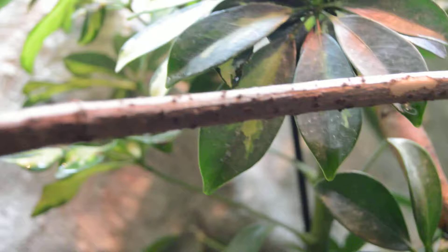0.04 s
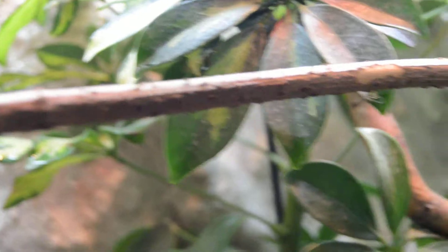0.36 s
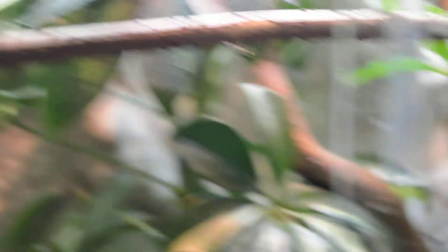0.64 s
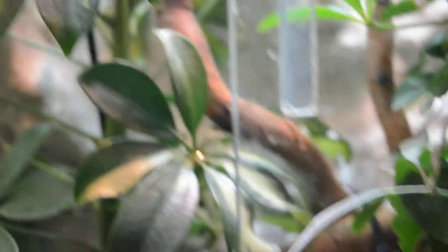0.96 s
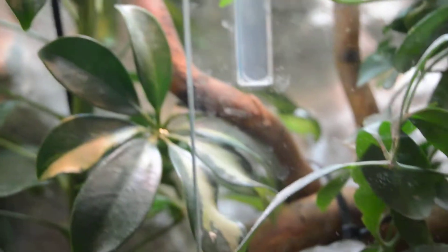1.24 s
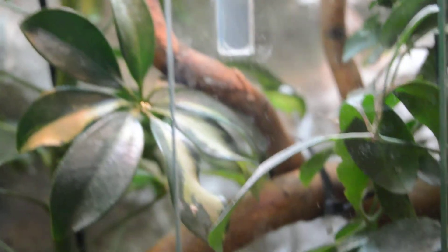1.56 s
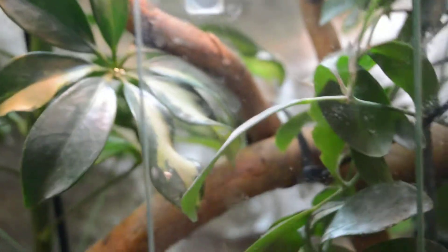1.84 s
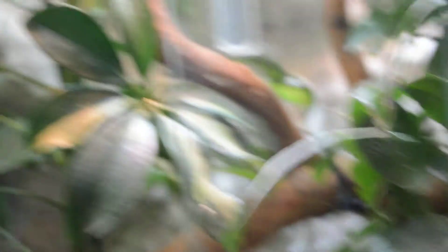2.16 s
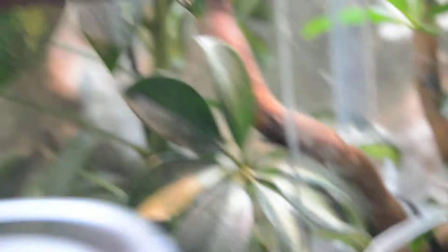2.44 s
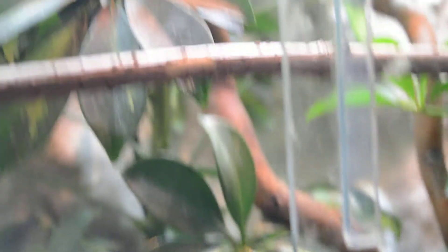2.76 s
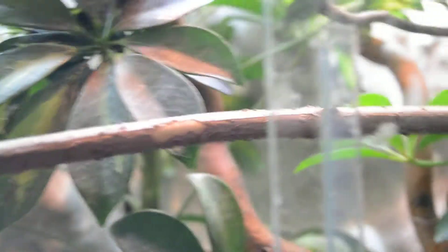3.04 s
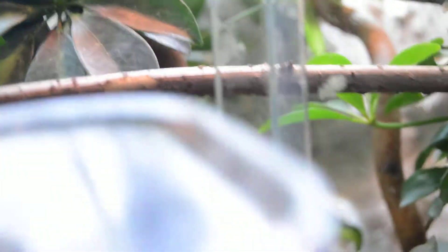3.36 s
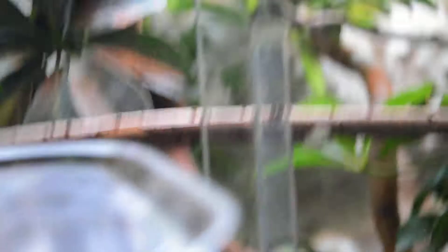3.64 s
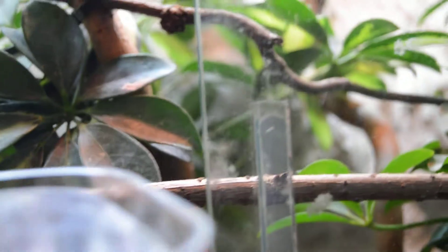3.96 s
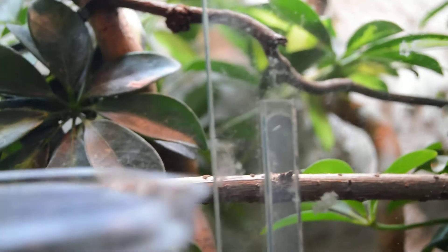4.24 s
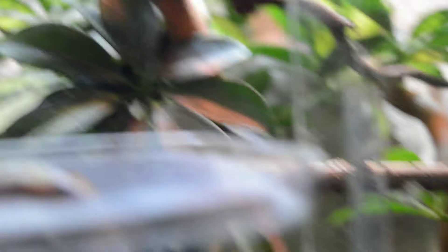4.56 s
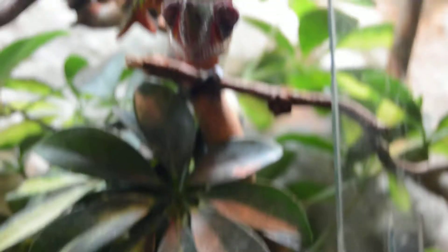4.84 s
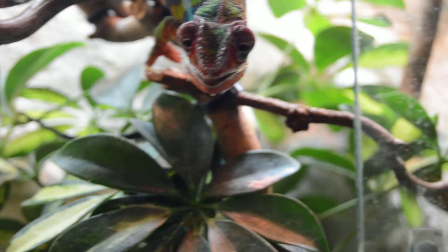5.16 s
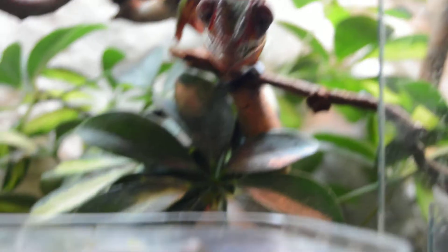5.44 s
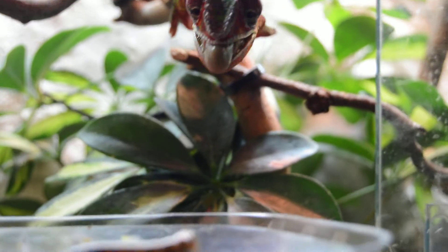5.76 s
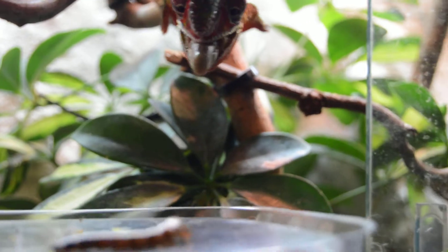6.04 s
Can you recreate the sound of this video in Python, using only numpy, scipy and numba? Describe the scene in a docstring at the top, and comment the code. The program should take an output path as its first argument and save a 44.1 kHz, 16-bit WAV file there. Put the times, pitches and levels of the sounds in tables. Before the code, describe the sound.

A thin plastic tub clicks, a catch snaps, and a glass terrarium door jerks free with a loud knock, then scrapes briefly.

```python
"""Plastic tub and terrarium door.

A thin plastic feeding tub clicks and flexes in the hand beside a leafy glass terrarium. A catch snaps.
The glass door jerks free with a rattling knock, then scrapes over grit in its track in two pushes.
Each impact is a noise crack plus damped modes. The sound fades in with a faint crackly hiss;
leaves then tick and rustle softly over room hiss and hum."""
import sys
import numpy as np
from scipy import signal
from scipy.fft import rfft, irfft
from scipy.io import wavfile
from scipy.ndimage import uniform_filter1d
from numba import njit

SR = 44100
rng = np.random.default_rng(int(sys.argv[2]) if len(sys.argv) > 2 else 0)


def output_pcm(signal):
    """Save a mono or channel-first signal as 16-bit PCM at the path in sys.argv[1].

    Samples are clipped to [-1, 1] before scaling.
    """
    pcm = np.clip(np.atleast_2d(signal).T, -1, 1) * 32767
    wavfile.write(sys.argv[1], SR, np.round(pcm).astype(np.int16))


N = 277389
RING_SAMPLES = SR // 4
CUTOFF_HZ = 15800

# room air: freq_hz, gain_db
AIR_SPECTRUM = [(25, -12), (45, -9.5), (85, -3), (150, -2.5), (230, -1), (330, -4), (600, -5), (1100, -6),
                (2000, -9), (3500, -11.5), (6000, -14), (8300, -14), (12000, -15.5), (15000, -19)]
# narrow high hiss: freq_hz, gain_db
HISS_SPECTRUM = [(9000, -34.5), (9750, -8), (9930, 17), (10150, -7), (11000, -25.5)]
# mains hum: freq_hz, level_db
HUM_PARTIALS = [(60, -72), (120, -76)]
# room reflections: freq_hz, gain_db
REVERB_SPECTRUM = [(100, 3.5), (700, 2.5), (1500, 3), (3000, -2.5), (7000, -2), (11000, -6.5), (16000, -16)]

# faint crackly hiss as the sound fades in (first row), then leaf rustles: middle_s, length_s, level_db
CRACKLE_SWELLS = [(.17, 0.29, -52), (.5, 0.12, -55), (.68, 0.086, -54), (.82, 0.24, -54.5),
                  (1.13, 0.2, -55.5), (1.55, 0.28, -59.5), (2.15, .2, -56), (3.27, 0.3, -57),
                  (5.84, 0.1, -59)]
# leaf and grit ticks: start_s, level_db
LEAF_TICKS = [(0.264, -40), (0.2865, -42), (0.6757, -36), (0.6986, -34), (0.711, -44), (0.7794, -36),
              (1.0744, -44), (1.1234, -41), (1.183, -35), (3.1774, -47), (5.8474, -35)]
# crackle and ticks: freq_hz, gain_db
CRACKLE_SPECTRUM = [(500, -16.5), (1500, -5), (4000, -3.5), (6000, -3.5), (8500, 3), (10500, 2.5),
                    (12500, -14.5), (16000, -23.5)]

# grip shifts on the tub: middle_s, length_s, level_db
GRIP_STROKES = [(.29, 0.08, -57), (.78, 0.6, -60), (1.4, .7, -55.5), (2.97, 0.5, -57.5), (4.55, 0.92, -64),
                (5.77, 0.14, -58.5), (6.04, 0.15, -58.5)]
# hand on plastic: freq_hz, gain_db
RUB_SPECTRUM = [(40, -19), (120, -11), (240, -2), (400, -8.5), (800, -9.5), (2500, -19.5), (8000, -35.5)]
# plastic creaks: start_s, pitch_hz, level_db
GRIP_CREAKS = [(.262, 2570, -53), (.287, 1450, -44), (.288, 2570, -50), (.314, 2500, -55),
               (.342, 2500, -46)]
# tub wall snaps: start_s, level_db, bass_db, treble_db
TUB_HITS = [(1.3326, -17.5, -4, 3), (1.3352, -23, 3, -6), (1.3463, -11, -8.5, 1), (1.3512, -21.5, 5.5, -19),
            (1.4125, -38, 9, 4), (1.4215, -32, 3, 0), (1.4405, -24.5, 18.5, 2.5), (1.4465, -35.5, 30.5, 1),
            (1.4552, -31, 9, -3), (1.4605, -38, 10, 3), (1.5465, -42, 4, 12), (1.5530, -39, 19, 13.5)]
# tub wall modes: freq_hz, level_db, t60_s
TUB_RING = [(236, -26.5, 0.072), (440, -31, 0.088), (628, -19.5, 0.053), (848, -13.5, 0.033),
            (1076, -17.5, 0.044), (1270, -16, 0.03), (1670, -15.5, 0.033), (1870, -20, 0.043),
            (2620, -27, 0.017), (2930, -13.5, 0.016), (3550, -17.5, 0.024), (4090, -7.5, .014),
            (4900, -26, .02), (6140, -26, 0.014), (7500, -9, 0.0055), (9000, -11, 0.014),
            (10000, -17.5, 0.034), (11400, -15, .015)]
# dense modes of tub and catch: freq_hz, gain_db
CLICK_SPECTRUM = [(200, -18.5), (700, 2.5), (2800, -0.5), (5500, -6.5), (10500, -11), (13000, -17.5),
                  (15800, -32)]
# catch snap: start_s, level_db, bass_db, treble_db
CATCH_HITS = [(2.2028, -13.5, 2, 1)]
# catch modes: freq_hz, level_db, t60_s
CATCH_RING = [(175, -31, 0.049), (756, -23, .02), (1140, -19, .033), (1280, -18, 0.04), (2230, -9, 0.031),
              (2490, -8.5, 0.037), (3304, -4, .018), (4250, -27.5, 0.013), (6310, -10.5, .012),
              (7370, -16.5, .011), (8100, -8, .01), (9330, -7, 0.011), (10400, -6, 0.0069)]

# door squeaks: start_s, length_s, start_hz, end_hz, level_db
DOOR_SQUEAKS = [(2.058, 0.016, 12100, 11500, -44), (3.214, 0.003, 10200, 10150, -35.5)]
# effort of the halting push: time_s, level_db, relative_treble_db
FIRST_PUSH = [(2.39, -46, -4), (2.422, -45, 0), (2.454, -34.5, -2.5), (2.484, -42, -0.5), (2.594, -53, 6.5),
              (2.606, -44.5, -1), (2.644, -58, -2), (2.708, -40, -4), (2.79, -54, 5), (2.822, -49, 6),
              (2.936, -54.5, 6), (2.945, -60, -1)]
# effort of the firm push: time_s, level_db, relative_treble_db
SECOND_PUSH = [(2.956, -49, 2), (2.964, -41, 5.1), (3.022, -44.5, 4.5), (3.03, -40, 5.8), (3.172, -50, 1.4),
               (3.182, -58, 6)]
# glass on grit: freq_hz, gain_db
SCRAPE_SPECTRUM = [(400, -18), (900, -4.5), (1350, 4.5), (1750, 5), (2250, 7.5), (2950, 2.5), (3600, 4.5),
                   (4700, 0.5), (5400, 2), (6200, -3.5), (7100, 2), (8000, 0), (11000, 0.5), (15500, -13)]
# scrape colour along the track: time_s, resonance_hz, hollow_hz
SCRAPE_TRAVEL = [(2.48, 9700, 6200), (2.72, 10600, 8500), (2.98, 9400, 7660), (3.02, 9100, 3970),
                 (3.15, 9400, 2160)]
# small slips, weak in bass: freq_hz, gain_db
SLIP_SPECTRUM = [(600, -6.5), (1500, -3.5), (2000, 0)]
# door hits its track: start_s, level_db, bass_db, treble_db
DOOR_HITS = [(2.3122, -4, -14, 4.5), (2.3209, -12, -16, 0), (2.3231, -12, -18, -3),
             (2.3325, 6.5, -10, -1.5), (2.3349, 4.5, -4, 2), (2.3425, -19, -14, -2), (2.3706, -3, -28, -1),
             (2.4680, -27, -5, -13), (2.9575, -29, -8, 4), (2.9920, -31, -6, 3), (3.0475, -27, -9, 13),
             (3.1213, -20, 0, 4.5), (3.1685, -30, -3, 6)]
# pane modes: freq_hz, level_db, t60_s
PANE_RING = [(829, -21, .06), (1260, -30, .05), (1980, -24, .11), (2170, -23, .11), (2384, -23, .15),
             (2461, -25, .14), (2597, -28, .12), (2830, -22, .09), (3020, -23, .08), (4180, -26, .07),
             (5103, -24, .09), (5410, -22, .1), (7493, -26, .09), (7938, -25, .09), (8340, -24, .1),
             (8617, -22, .1), (8966, -25, .1), (9380, -22, .11), (9800, -23, .11), (10043, -24, .1)]
# dense modes of the pane: freq_hz, gain_db
PANE_SPECTRUM = [(200, -25), (600, -22), (1500, -11), (2300, 1), (3000, 2), (3600, -7), (4300, -2),
                 (4750, -6), (5300, 1), (6200, -7), (8600, 1), (10200, 0), (12000, -11), (15800, -27)]


def amp(db):
    """Decibels to gain."""
    return 10 ** (np.asarray(db) / 20)


def unit_rms(x):
    """Scale to rms 1."""
    return x / np.sqrt(np.mean(x ** 2) + 1e-20)


def curves(rows):
    """Breakpoint columns, interpolated per sample."""
    times_s, *columns = np.transpose(rows)
    return [np.interp(np.arange(N) / SR, times_s, column) for column in columns]


def gate(rows):
    """Soft-edged gate over a curve's span."""
    t = np.arange(N) / SR
    return uniform_filter1d(1. * ((t > rows[0][0]) & (t < rows[-1][0])), size=40)


def swells(rows, end_drop_db=7.5):
    """Gain of bell-shaped swells, summed in power."""
    t = np.arange(N) / SR
    power = np.zeros(N)
    for middle_s, length_s, level_db in rows:
        drop_db = end_drop_db * np.minimum((2 * (t - middle_s) / length_s) ** 2, 20)
        power += amp(level_db - drop_db) ** 2
    return np.sqrt(power)


def add(out, start_s, sound):
    """Mix in at start_s."""
    at = int(np.clip(round(start_s * SR), 0, N - 1))
    out[at:at + len(sound)] += sound[:N - at]


def response(spectrum, size=8192):
    """Minimum-phase impulse response of a spectrum."""
    hz, db = np.transpose(spectrum)
    grid_hz = np.maximum(np.fft.rfftfreq(size, 1 / SR), 1)
    gain = amp(np.interp(np.log(grid_hz), np.log(hz), db))
    cepstrum = irfft(np.log(gain))
    cepstrum[1:size // 2] *= 2
    cepstrum[size // 2 + 1:] = 0
    return irfft(np.exp(rfft(cepstrum)))[:size // 2]


def colour(x, spectrum):
    """Filter by a spectrum."""
    return signal.oaconvolve(x, response(spectrum))[:len(x)]


def excite(force, body):
    """Drive a body's response, scaled to unit energy."""
    return signal.oaconvolve(force, body / np.linalg.norm(body))[:N]


@njit
def sweep(x, centre_hz, damping):
    """Swept state-variable filter; returns band-pass, low-pass."""
    band, low, s1, s2 = np.zeros(len(x)), np.zeros(len(x)), 0., 0.
    for i in range(len(x)):
        g = np.tan(np.pi * min(centre_hz[i], CUTOFF_HZ) / SR)
        band[i] = (s1 + g * (x[i] - s2)) / (1 + g * (g + damping))
        low[i] = s2 + g * band[i]
        s1, s2 = 2 * band[i] - s1, 2 * low[i] - s2
    return damping * band, low


def noise(spectrum, samples=N):
    """Coloured noise, rms 1."""
    return unit_rms(colour(rng.standard_normal(samples), spectrum))


def grains(rate_hz, spread_db):
    """Random micro-contacts of uneven size, rms 1."""
    sizes = amp(spread_db * np.minimum(rng.exponential(1, N), 4))
    signs = rng.choice([-1, 1], N)
    return unit_rms(sizes * signs * (rng.random(N) < rate_hz / SR))


def decay(t60_s):
    """Exponential envelope."""
    return np.exp(-np.log(1000) * np.arange(RING_SAMPLES) / SR / t60_s)


def crack(spectrum, t60_s):
    """Dense modes as decaying noise."""
    return noise(spectrum, RING_SAMPLES) * decay(t60_s)


def ring(modes):
    """Damped sines of a struck body, alternating in polarity."""
    t = np.arange(RING_SAMPLES) / SR
    return sum((-1) ** k * amp(db) * np.sin(2 * np.pi * hz * t) * decay(t60_s)
               for k, (hz, db, t60_s) in enumerate(modes))


def impacts(hits, modes, spectrum, ring_db, crack_db, crack_t60_s):
    """Crack plus ring per hit; heavy hits add bass, hard ones treble."""
    out, body = np.zeros(N), amp(ring_db) * ring(modes)
    for start_s, level_db, bass_db, treble_db in hits:
        contact = [(250, bass_db), (1800, 0), (3000, 0), (8000, treble_db)]
        struck = body + amp(crack_db) * crack(spectrum, crack_t60_s)
        add(out, start_s, amp(level_db) * colour(struck, contact))
    return out


def background(air_db=-53.4, hiss_db=-74):
    """Steady room air, narrow high hiss and mains hum."""
    t = np.arange(N) / SR
    air = amp(air_db) * noise(AIR_SPECTRUM)
    hiss = amp(hiss_db) * noise(HISS_SPECTRUM)
    hum = sum(amp(db) * np.sqrt(2) * np.sin(2 * np.pi * hz * t) for hz, db in HUM_PARTIALS)
    return air + hiss + hum


def reflections(x, t60_s=0.19, build_s=0.006):
    """Diffuse reverb of a small furnished room."""
    build = 1 - np.exp(-np.arange(RING_SAMPLES) / SR / build_s)
    return excite(x, crack(REVERB_SPECTRUM, t60_s) * build)


def crackle():
    """Faint crackly hiss as the sound fades in, then leaf rustles and ticks."""
    texture = unit_rms(colour(grains(rate_hz=3100, spread_db=6.5), CRACKLE_SPECTRUM))
    out = swells(CRACKLE_SWELLS) * texture
    for start_s, level_db in LEAF_TICKS:
        add(out, start_s, amp(level_db) * crack(CRACKLE_SPECTRUM, t60_s=0.016))
    return out


def grip():
    """The hand rubs dully on the tub and makes it creak."""
    friction = unit_rms(colour(grains(rate_hz=2500, spread_db=-2), RUB_SPECTRUM))
    out = swells(GRIP_STROKES) * friction
    for start_s, pitch_hz, level_db in GRIP_CREAKS:
        peak = [(pitch_hz / 2, -30), (pitch_hz, 0), (pitch_hz * 2, -36)]
        add(out, start_s, amp(level_db) * crack(peak, t60_s=0.039))
    return out


def tub_clicks():
    """The thin wall snaps as it flexes."""
    return impacts(TUB_HITS, TUB_RING, CLICK_SPECTRUM, ring_db=-0.5, crack_db=-5, crack_t60_s=0.02)


def catch_snap():
    """The door's catch snaps and rings briefly."""
    return impacts(CATCH_HITS, CATCH_RING, CLICK_SPECTRUM, ring_db=-1, crack_db=-12.5, crack_t60_s=0.017)


def door_squeaks():
    """Brief stick-slip whistles, falling in pitch."""
    out = np.zeros(N)
    for start_s, length_s, start_hz, end_hz, level_db in DOOR_SQUEAKS:
        pitch_hz = np.linspace(start_hz, end_hz, int(length_s * SR))
        tone = np.sin(2 * np.pi * np.cumsum(pitch_hz) / SR)
        add(out, start_s, amp(level_db) * signal.windows.tukey(len(tone)) * tone)
    return out


def door_scrape(ring_gain=0.11, stutter_db=1.7, split_hz=6500, edge_hz_per_db=116):
    """Grit excites the sliding pane in stick-slip stutters."""
    level_db, treble_db = curves(np.vstack([FIRST_PUSH, SECOND_PUSH]))
    stutter = unit_rms(uniform_filter1d(rng.standard_normal(N), size=130))
    grit = grains(rate_hz=4500, spread_db=3.3) * amp(stutter_db * stutter)
    scrape = colour(grit + ring_gain * excite(grit, ring(PANE_RING)), SCRAPE_SPECTRUM)
    # the moving contact point shifts a resonance and a hollow
    resonance_hz, hollow_hz = curves(SCRAPE_TRAVEL)
    scrape += amp(3) * sweep(scrape, resonance_hz, damping=0.069)[0]
    scrape -= amp(-3) * sweep(scrape, hollow_hz, damping=0.35)[0]
    # the top edge rises with effort
    edge_hz = 12800 + edge_hz_per_db * (level_db + 42)
    for damping in (0.9, 1.45):
        _, scrape = sweep(scrape, edge_hz, damping)
    crossover = [signal.butter(4, split_hz, side, fs=SR, output="sos") for side in ("low", "high")]
    low, high = (unit_rms(signal.sosfilt(sos, scrape)) for sos in crossover)
    pushing = gate(FIRST_PUSH) + gate(SECOND_PUSH)
    return pushing * amp(level_db) * (low + amp(treble_db) * high)


def door_judder(start_s=2.308, hold_s=0.063, level_db=-15, sag_db_per_s=74, release_db_per_s=801.5):
    """The sticking door chatters in its track; each slip cracks and rings the pane."""
    age_s = np.arange(N) / SR - start_s
    sag_db = sag_db_per_s * np.maximum(age_s, 0)
    release_db = release_db_per_s * np.clip(age_s - hold_s, 0, 0.5)
    envelope = amp(level_db - sag_db - release_db) * (age_s > 0)
    chatter = colour(grains(rate_hz=5100, spread_db=4) * envelope, SLIP_SPECTRUM)
    return excite(chatter, response(PANE_SPECTRUM)) + amp(-8) * excite(chatter, ring(PANE_RING))


def door_knocks():
    """The pane strikes its track and rings."""
    return impacts(DOOR_HITS, PANE_RING, PANE_SPECTRUM, ring_db=-12, crack_db=-3, crack_t60_s=0.007)


def scene():
    """Mono mix: door and catch close and dry; more room on tub, grip and crackle."""
    tub, catch = tub_clicks(), catch_snap()
    door = amp(1.5) * door_knocks() + door_judder() + amp(1.5) * door_scrape() + door_squeaks()
    small_sounds = tub + crackle() + grip()
    reverb = reflections(amp(-15.5) * small_sounds + amp(-27.5) * (door + catch))
    return (small_sounds + catch + door + reverb + background())[None]


def record(dry, fade_start_s=0.07, fade_end_s=0.28, fade_depth_db=15, gain_db=-3):
    """Brief silence, fade-in, clip at full scale, steep low-pass."""
    t = np.arange(N) / SR
    rise = np.clip((t - fade_start_s) / (fade_end_s - fade_start_s), 0, 1)
    gain = (t > fade_start_s) * amp(gain_db - fade_depth_db * (1 - rise ** 2))
    low_pass = signal.ellip(10, 0.1, 70, CUTOFF_HZ, fs=SR, output="sos")
    return signal.sosfilt(low_pass, np.clip(dry * gain, -1, 1))


dry = scene()
out = record(dry)
output_pcm(out)
```